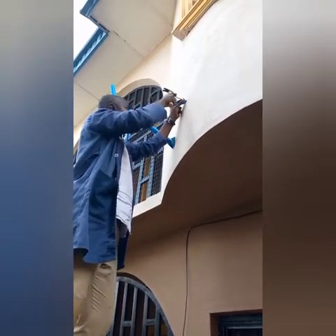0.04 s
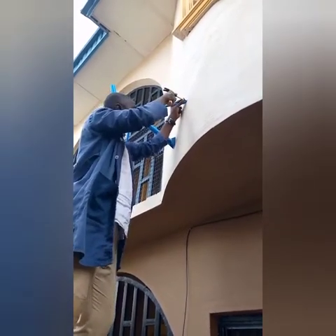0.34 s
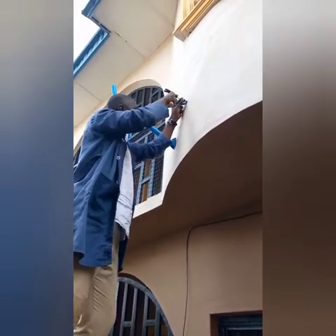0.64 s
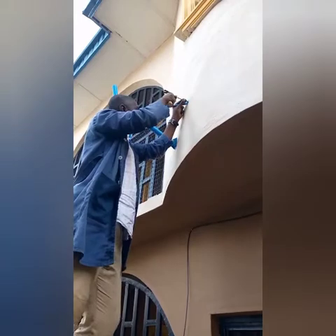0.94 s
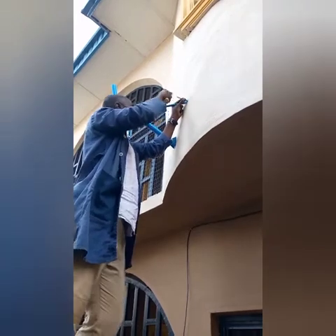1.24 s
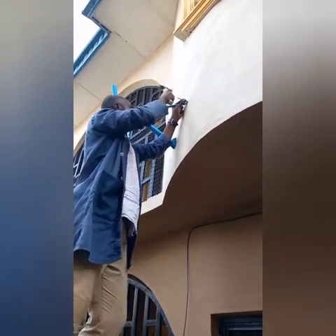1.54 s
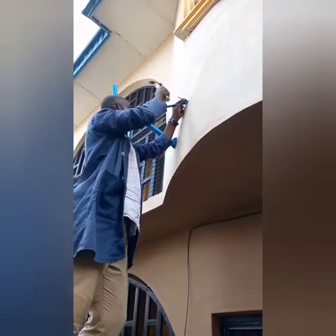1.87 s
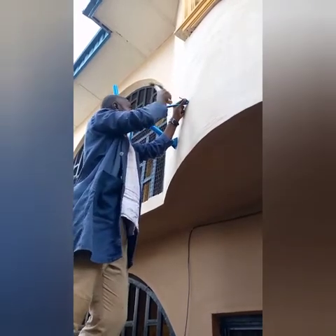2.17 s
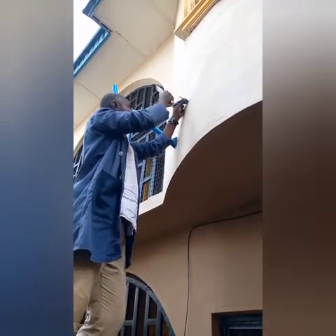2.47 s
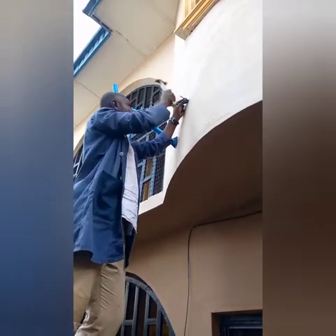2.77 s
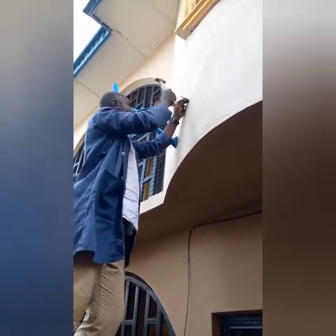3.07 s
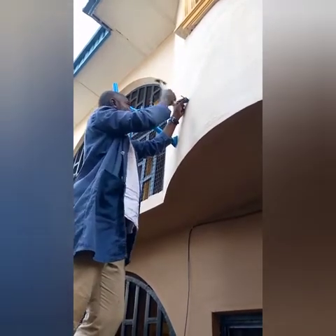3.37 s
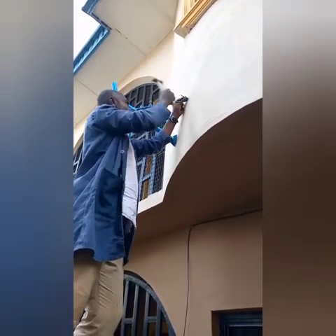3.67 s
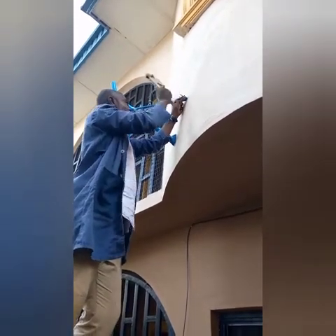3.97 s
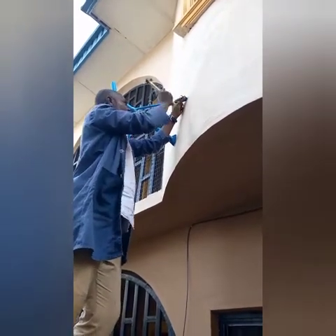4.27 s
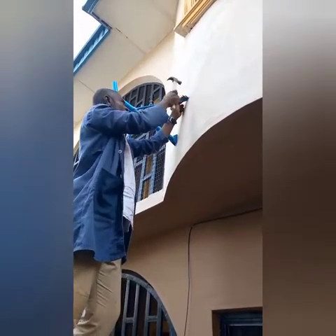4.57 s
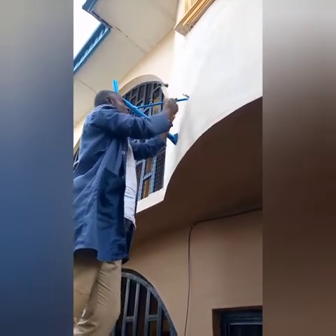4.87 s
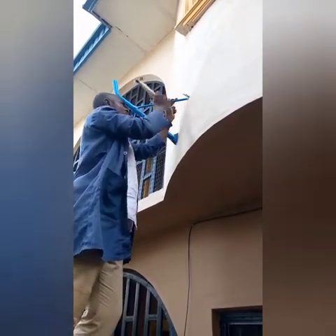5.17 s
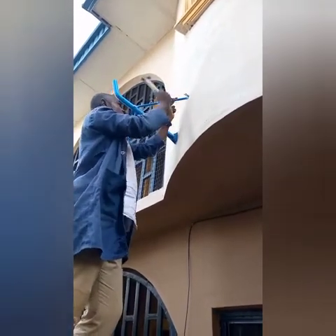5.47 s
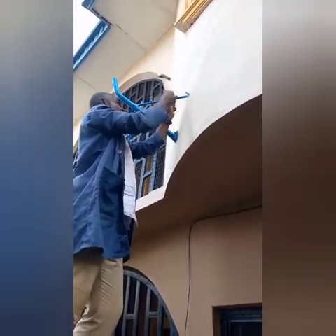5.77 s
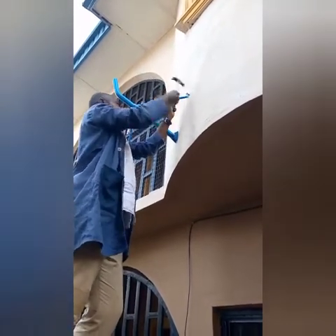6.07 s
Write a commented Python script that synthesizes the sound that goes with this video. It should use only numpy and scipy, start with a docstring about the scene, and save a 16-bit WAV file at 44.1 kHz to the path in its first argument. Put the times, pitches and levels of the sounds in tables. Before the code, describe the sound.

Sharp, ringing hammer blows on a masonry wall echo in a narrow yard, about three a second with one short pause.

```python
"""First comes the fading ring of a hammer blow and a light tap or two, then steady hammering, about
three blows a second with one short pause. A steel hammer is driving a fixing into a masonry wall:
each blow cracks, thuds in the wall and rings the steel, and a narrow yard echoes for half a second.
Small birds whistle far away over quiet outdoor air. After the pause a bracket rings along too.
A phone a few metres below hears it all, almost in mono."""
import sys
import numpy as np
from scipy import signal
from scipy.fft import rfft, irfft, next_fast_len
from scipy.io import wavfile
from scipy.ndimage import uniform_filter1d, map_coordinates

SR = 44100
rng = np.random.default_rng(int(sys.argv[2]) if len(sys.argv) > 2 else 0)


def master(y):
    """Save y as 16-bit WAV."""
    cut = np.clip(np.atleast_2d(y).T, -1, 1)
    pcm = np.round(cut * 32767)  # scale
    wavfile.write(sys.argv[1], SR, pcm.astype(np.int16))


N = 270333

# The hammer blows. Each row: start in seconds, force in dB, boosts in dB for the long steel ring,
# the fixing's clank and the treble, then the ping's pitch in Hz and its boost in dB.
BLOWS = [(-0.13, -7, 12, 5.5, 6, 2010, 7), (0.1756, -26.5, 12, 7.5, -4, 2220, 3.5),
         (0.532, -47.5, -7, 0, 8, 7900, -2), (1.197, -2, -15, 3, 4.5, 10250, 6.5),
         (1.502, 2.5, 10, -3, 1.5, 4540, 4.5), (1.8002, 2, 9.5, -0.5, 4, 6400, 4),
         (2.105, 3.5, 2, 1.5, 5.5, 6170, 4), (2.3996, 1, 7.5, 4, 3.5, 1850, 5.5),
         (2.707, 1, 1, -14, -4.5, 9750, 6), (3.0067, 0, -7, -9, 6, 6100, 2.5),
         (3.2952, 2.5, 1, -2.5, 0.5, 11600, 3), (3.5909, 1.5, 5, 5, 1.5, 1030, 6),
         (3.8674, 1, -4.5, 5, 2.5, 960, 6), (4.1463, 1.5, 6.5, 1, 1.5, 9370, 3.5),
         (4.411, -0.5, 9.5, 13.5, -5, 7470, 7), (5.0413, -1.5, 5, -4.5, -9, 7960, 8),
         (5.365, -1.5, 18, -8.5, 10, 8330, 8), (5.6938, 1, -9, -11.5, 1.5, 7320, 13.5),
         (6.043, -1, 19.5, -16, 7, 5730, 8)]
# The fixing's short-lived resonances. Each row: pitch in Hz, width in Hz, level in dB.
CRACK_RESONANCES = [(510, 210, 3), (1363, 79, 2), (2635, 410, 5), (4454, 510, 1), (5540, 430, -6.5),
                    (5880, 340, 2), (7760, 2600, -6.5), (9250, 560, -3.5), (11170, 360, -3),
                    (10800, 320, -1), (15100, 1100, -18)]
# First echoes off the nearest walls. Each row: delay in seconds, level in dB.
WALL_ECHOES = [(0.0113, -16.5), (0.0155, -41.5), (.0185, -16.5), (0.024, -18.5)]
# How long the yard echoes. Each row: frequency in Hz, seconds to fade by 60 dB.
YARD_FADE = [(90, 1), (220, 0.49), (560, 0.65), (1500, 0.5), (4000, 0.45), (7000, 0.41), (10000, 0.35),
             (15000, 0.24)]
# The tone of an average blow as it fills the yard. Each row: frequency in Hz, level in dB.
ECHO_TONE = [(30, -33.5), (75, -14), (180, -6), (235, 1.5), (380, 0), (900, -9.5), (2400, -6), (4400, -9.5),
             (6100, -4), (7900, -10.5), (9500, -9.5), (13500, -20), (15000, -10.5), (16000, -25)]
# A faint left-right hiss in the treble of each blow. Each row: frequency in Hz, side gain in dB.
TREBLE_WIDTH = [(2800, -60), (4500, -22), (8000, -14), (12000, -10), (15000, -8)]
# Notes that every blow rings, low ones in wall and yard, high ones in the steel.
# Each row: pitch in Hz, level in dB, seconds to fade by 60 dB.
STRUCK_NOTES = [(102, -51, 1.0), (153, -43, .7), (205, -39, .55), (226, -39, .6), (306, -31, .85),
                (330, -38, .75), (357, -38, .6), (484, -36, .6), (510, -39, .6), (648, -38, .6),
                (722, -39.5, .6), (1416, -42, .55), (1554, -44, .55), (1899, -43, .6), (2400, -39, .5),
                (2514, -37, .45), (2766, -42, .6), (4565, -46, .5), (5685, -41, .45), (6014, -38, .5),
                (6061, -38, .5), (6148, -38, .5), (7130, -39, .5), (10850, -41, .4), (11730, -48, .35)]
# How much thud the fixing passes into the wall. Each row: time in seconds, boost in dB.
WALL_THUD = [(0, 4), (1.2, -1), (3.1, 0.5), (4.4, -9), (6.04, -4.5)]
# Two close pitches of a lower metal note. Each row: pitch in Hz, level in dB, seconds to fade by 60 dB.
LOW_METAL_NOTES = [(1025, -50, 1.5), (1039, -52, 1.4)]
# The tone of the outdoor background. Each row: frequency in Hz, level in dB.
AIR_TONE = [(30, -10.5), (70, -5.5), (125, 4), (350, -7.5), (800, -9.5), (1400, -20.5), (2300, -16),
            (4500, -17.5), (6800, -24), (8000, -31), (15000, -48.5)]
# The clearest bird calls. Each row: start in seconds, length in seconds, pitch in Hz, level in dB.
BIRD_CALLS = [(0.283, 0.058, 3470, -66), (0.43, 0.04, 6850, -63), (0.608, 0.03, 4050, -58),
              (0.759, 0.052, 3300, -64), (0.885, 0.074, 4570, -64), (1.053, .031, 4030, -66),
              (4.945, 0.086, 4500, -67.5)]
# The bracket's notes. Each row: pitch in Hz, level in dB, seconds to fade by 60 dB.
BRACKET_NOTES = [(2005, -46, .65), (2769, -43, 1.0), (3380, -45, .65)]
# How the microphone's opening colours the treble. Each row: frequency in Hz, gain in dB.
MIC_TONE = [(10800, -0.5), (11300, -8), (11750, 4.5), (12600, -3.5), (14000, -7.5), (14600, 1.5),
            (15600, -1.5)]

LEAD = SR // 250  # samples of room for the graze before each blow


def amp(db):
    """Turn decibels into a gain."""
    return 10 ** (np.asarray(db) / 20)


def unit(x):
    """Scale a signal to an average (rms) level of 1."""
    return x / np.sqrt(np.mean(x ** 2) + 1e-20)


def along(points, hz):
    """Read between the rows of a frequency table, on an octave scale."""
    frequencies, values = np.transpose(points)
    return np.interp(np.log(hz + 1), np.log(frequencies), values)


def bump(hz, centre_hz, octaves):
    """A bell-shaped curve of height 1 around one frequency."""
    return np.exp(-.5 * (np.log2((hz + 1) / centre_hz) / octaves) ** 2)


def wobble(rate, size):
    """A smooth curve through `rate` random values a second."""
    coarse = np.arange(0, size + 32, 32)
    curve = map_coordinates(rng.standard_normal(int(size * rate / SR) + 4), [coarse * rate / SR])
    return np.interp(np.arange(size), coarse, curve)


def coloured(x, gain_db):
    """Change the tone by gain_db(hz), ringing only after a sound, never before (minimum phase)."""
    size = 2 * next_fast_len(x.shape[-1] // 2 + 4096)
    cepstrum = irfft(np.log(amp(gain_db(np.fft.rfftfreq(size, 1 / SR)))), size)
    cepstrum[1:size // 2] *= 2
    cepstrum[size // 2 + 1:] = 0
    return irfft(rfft(x, size) * np.exp(rfft(cepstrum)), size)[..., :x.shape[-1]]


def add(track, start_s, sound):
    """Mix a sound into the track, dropping whatever falls outside it."""
    start = round(start_s * SR)
    first, end = max(start, 0), min(start + sound.shape[-1], N)
    if end > first:
        track[..., first:end] += sound[..., first - start:end - start]


def crack(contact_s=0.00023, fade_s=0.0025, graze_db=-26, graze_s=0.0022, floor_db=-17):
    """The hammer grazes the fixing, lands with a burst that excites it, and the nearest walls answer."""
    t = np.arange(SR) / SR
    burst = rng.standard_normal(SR) * np.exp(-np.maximum(t - contact_s, 0) / fade_s)
    graze = amp(graze_db) * np.roll(burst, LEAD - round(graze_s * SR))
    heard = np.roll(burst, LEAD) + graze
    for delay_s, db in WALL_ECHOES:
        heard += amp(db) * np.roll(burst, LEAD + round(delay_s * SR))

    def fixing_db(hz):
        peaks = sum(amp(db) ** 2 / (1 + ((hz - centre) / width) ** 2) ** 2
                    for centre, width, db in CRACK_RESONANCES)
        bass_cut = (hz + 1) ** 2 / (hz ** 2 + 250 ** 2)
        return 10 * np.log10((peaks + amp(floor_db) ** 2) * bass_cut)
    return coloured(heard, fixing_db)


def yard_echo(hold_s=0.049, build_s=0.0083):
    """A wash of echo builds up, holds between the hard walls, then dies away, treble first."""
    hz, t, spectrum = signal.stft(rng.standard_normal(SR), SR, nperseg=256)
    fall_db = -60 * (np.hypot(t, hold_s) - hold_s) / along(YARD_FADE, hz)[:, None]
    echo = signal.istft(spectrum * amp(fall_db), SR, nperseg=256)[1][:SR]
    return echo * (1 - np.exp(-np.arange(SR) / SR / build_s))


def ring(hz, fade_s, waver_db, attack_s=0.012, waver_rate=28, blur_radians=0.86):
    """One note fades by 60 dB in fade_s, wavering as its echoes overlap."""
    t = np.arange(SR) / SR
    swell = amp(waver_db * wobble(waver_rate, SR)) * (1 - np.exp(-t / attack_s))
    phase = 2 * np.pi * (hz * t + rng.random()) + blur_radians * wobble(waver_rate, SR)
    return swell * np.exp(-np.log(1000) * t / fade_s) * np.sin(phase)


def ripple(hz, spacing_hz=270):
    """Crowded resonances of steel and wall put random peaks and dips in the tone."""
    broad_points, fine_points = rng.standard_normal((2, 512))
    broad = map_coordinates(broad_points, [hz / spacing_hz], mode="mirror")
    fine = map_coordinates(fine_points, [4 * hz / spacing_hz], mode="mirror")
    return (.8 * broad + .7 * fine) * hz / (hz + 700)


def landing(blow, start_s, treble_db, ping_hz, ping_db, uneven_db=3.0):
    """Where and how squarely the hammer lands decides the wall's thud, the treble and one narrow ping."""
    thud_db = np.interp(start_s, *np.transpose(WALL_THUD))

    def tone_db(hz):
        thud = thud_db * bump(hz, centre_hz=387, octaves=0.46)
        treble = treble_db * bump(hz, centre_hz=14800, octaves=0.39)
        ping = ping_db * bump(hz, ping_hz, octaves=0.12)
        return thud + treble + ping + uneven_db * ripple(hz)
    return coloured(blow, tone_db)


def steel_ring(hz=7495, gap_hz=11, fade_s=.9):
    """The hammer head rings at two close pitches that throb together and swell as the yard fills."""
    upper = ring(hz, fade_s, waver_db=3.2, attack_s=.045)
    lower = ring(hz - gap_hz, fade_s, waver_db=3.2, attack_s=.045)
    return upper + amp(-4.5) * lower


def hammer(crack_db=-6, echo_db=-13, notes_db=-1, steel_db=-42, repeat_share=0.38):
    """Every blow cracks, rings and echoes. Returns the middle and the side (left-right) signal."""
    track = np.zeros((2, N))
    same_echo = yard_echo()
    for start_s, force_db, ring_db, clank_db, treble_db, ping_hz, ping_db in BLOWS:
        clank = lambda hz: clank_db * bump(hz, centre_hz=2600, octaves=.24)
        # part of the yard's answer repeats, part changes with each swing
        echo = np.sqrt(repeat_share) * same_echo + np.sqrt(1 - repeat_share) * yard_echo()
        side_hiss = yard_echo()  # separate noise with the same fade
        tails = np.array([echo, side_hiss])
        # the fixing's clank colours the crack fully, the tails half as much
        blow = amp(echo_db) * coloured(tails, lambda hz: along(ECHO_TONE, hz) + .5 * clank(hz))
        for hz, db, fade_s in STRUCK_NOTES:
            blow[0] += amp(notes_db + db + rng.normal(0, 3.1)) * ring(hz, fade_s, waver_db=-0.5)
        blow = np.pad(blow, ((0, 0), (LEAD, 0)))[:, :SR]
        blow[0] += amp(crack_db) * coloured(crack(), clank)
        blow = amp(force_db) * landing(blow, start_s, treble_db, ping_hz, ping_db)
        add(track, start_s - LEAD / SR, blow)
        add(track[0], start_s, amp(steel_db + force_db + ring_db) * steel_ring())
    return track[0], coloured(track[1], lambda hz: along(TREBLE_WIDTH, hz))


def metal_ring(notes):
    """Struck metal sounds several fading notes at once."""
    return sum(amp(db) * ring(hz, fade_s, waver_db=3.5, blur_radians=.6) for hz, db, fade_s in notes)


def low_metal_note():
    """Two close pitches throb and fade after the first blow, which lands just before the start."""
    track = np.zeros(N)
    add(track, BLOWS[0][0], metal_ring(LOW_METAL_NOTES))
    return track


def air(level_db=-66.0, patchy_db=3):
    """A quiet outdoor hush that drifts louder and softer in patches."""
    spectrum = signal.stft(rng.standard_normal(N), nperseg=1024)[2]
    patches = uniform_filter1d(rng.standard_normal(spectrum.shape), size=5, axis=0)  # smooth in pitch
    patches = uniform_filter1d(patches, size=9, axis=1)  # and in time
    noise = signal.istft(spectrum * amp(patchy_db * unit(patches)), nperseg=1024)[1][:N]
    return amp(level_db) * unit(coloured(noise, lambda hz: along(AIR_TONE, hz)))


def birds(echo_db=-2.5, direct_db=-9, twitter_db=-76, twitter_count=130, call_glide=0.97):
    """Distant birds give short, slightly falling whistles over fainter twitters, smeared by the yard."""
    song = np.zeros(N)
    notes = [(start_s, length_s, hz, hz * call_glide, db) for start_s, length_s, hz, db in BIRD_CALLS]
    for when, long, high, glide, loud in rng.random((twitter_count, 5)):
        hz = 2200 + 3200 * high
        end_hz = hz * (.93 + .14 * glide)
        notes.append((when * N / SR, .03 + .04 * long, hz, end_hz, twitter_db + 5 * loud))
    for start_s, length_s, start_hz, end_hz, db in notes:
        size = int(length_s * SR)
        pitch = np.linspace(start_hz, end_hz, size) * (1 + .016 * wobble(150, size))
        whistle = signal.windows.hann(size) * np.sin(2 * np.pi * np.cumsum(pitch) / SR)
        add(song, start_s, amp(db) * unit(whistle))
    echo = yard_echo()
    smeared = signal.fftconvolve(song, echo / np.linalg.norm(echo))[:N]
    return amp(direct_db) * song + amp(echo_db) * smeared


def bracket(from_s=4.7):
    """After the pause, each blow sets the bracket ringing."""
    track = np.zeros(N)
    for start_s, force_db, *_ in BLOWS:
        if start_s > from_s:
            add(track, start_s, amp(force_db) * metal_ring(BRACKET_NOTES))
    return track


def scene():
    """Everything sits in the centre; a faint treble hiss on each blow slightly widens the sound."""
    mid, side = hammer()
    mid = mid + low_metal_note() + bracket() + birds() + air()
    return np.array([mid + side, mid - side])


def record(dry, ceiling=0.9, top_hz=15880):
    """The phone colours the treble, rounds off the tallest peaks and cuts the sound above top_hz."""
    heard = coloured(dry, lambda hz: along(MIC_TONE, hz))
    rounded = heard / (1 + np.abs(heard / ceiling) ** 4) ** (1 / 4)
    size = next_fast_len(N + SR // 2)
    treble_cut = 1 / (1 + (np.fft.rfftfreq(size, 1 / SR) / top_hz) ** 160)
    return irfft(rfft(rounded, size) * treble_cut, size)[:, :N]


dry = scene()
out = record(dry)
master(out)
```